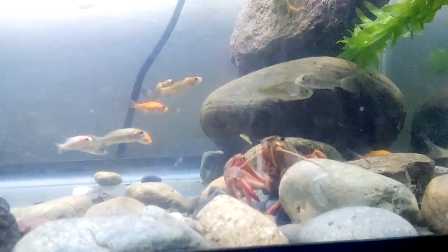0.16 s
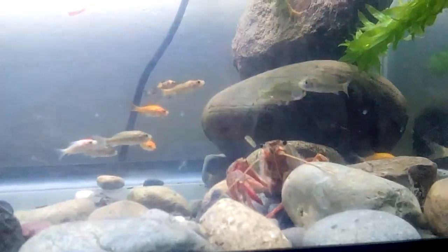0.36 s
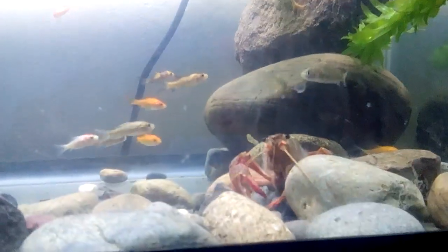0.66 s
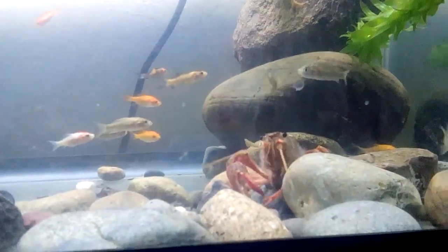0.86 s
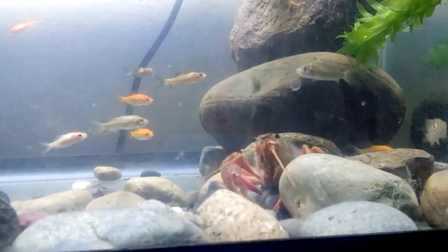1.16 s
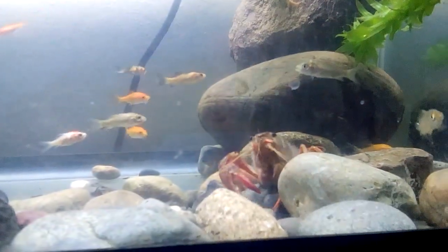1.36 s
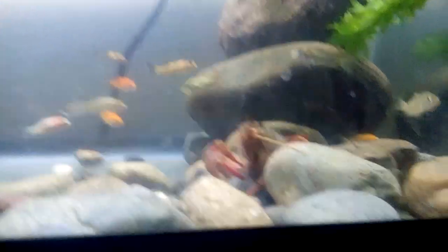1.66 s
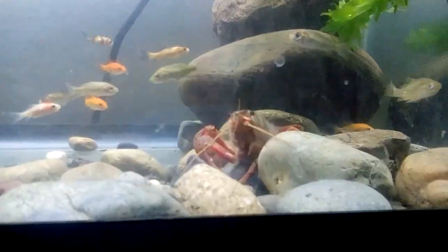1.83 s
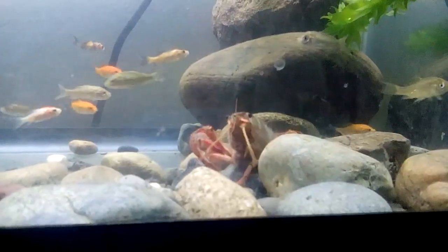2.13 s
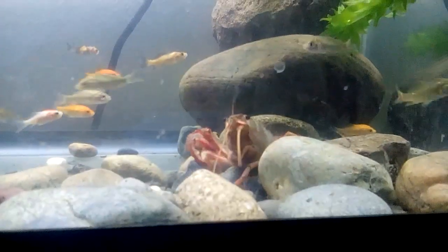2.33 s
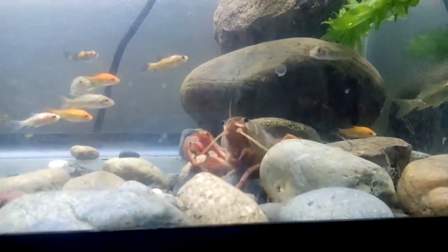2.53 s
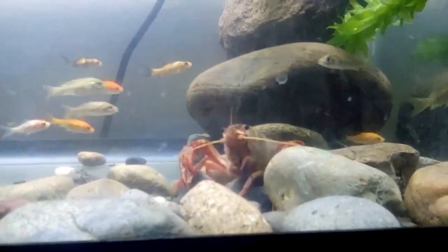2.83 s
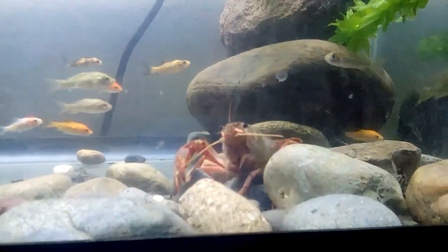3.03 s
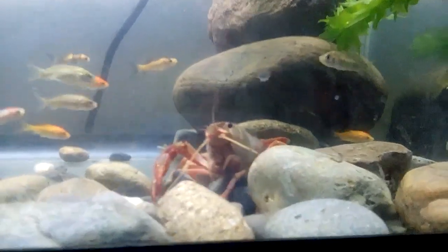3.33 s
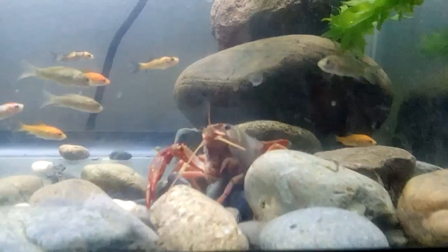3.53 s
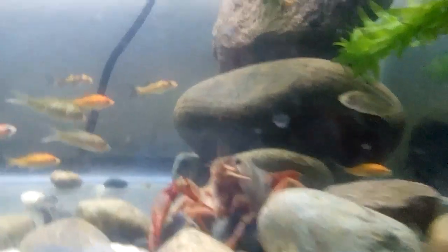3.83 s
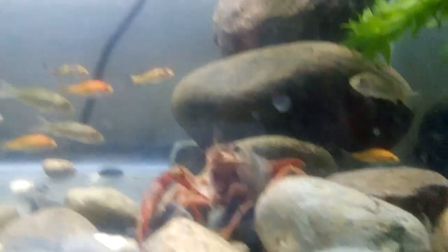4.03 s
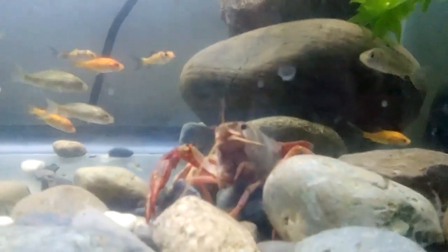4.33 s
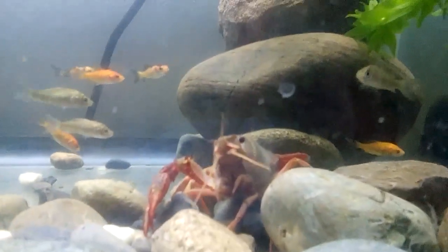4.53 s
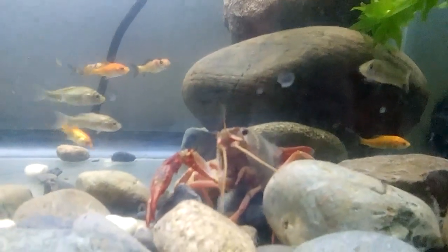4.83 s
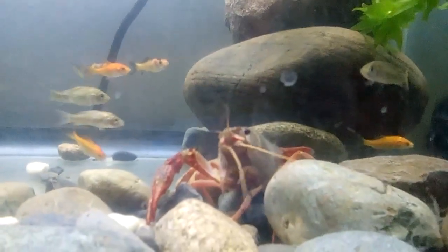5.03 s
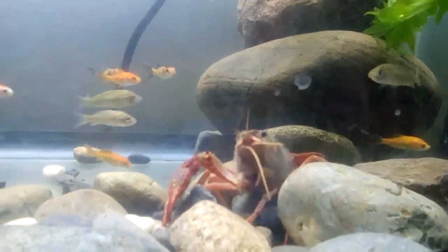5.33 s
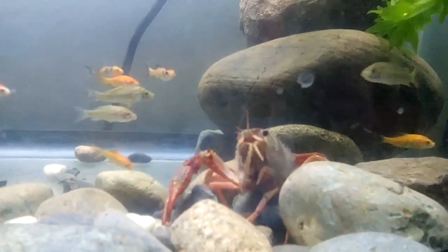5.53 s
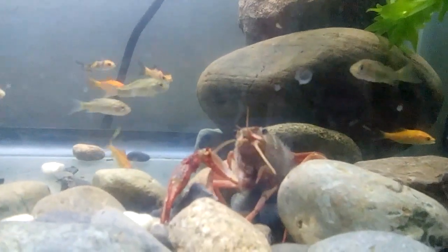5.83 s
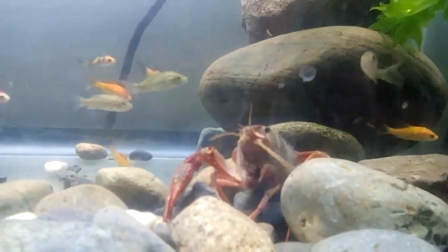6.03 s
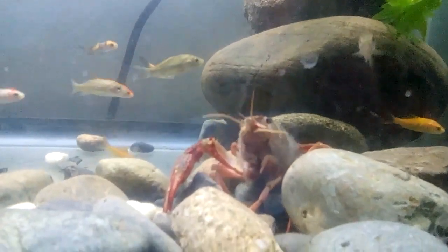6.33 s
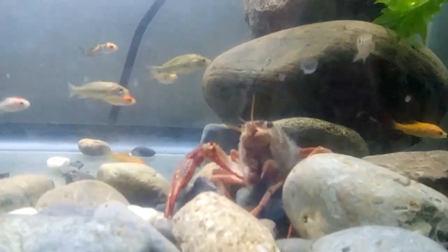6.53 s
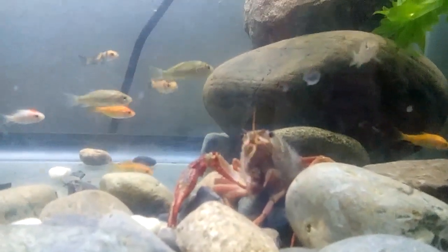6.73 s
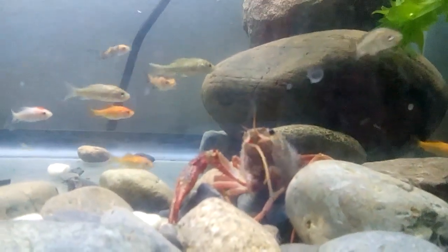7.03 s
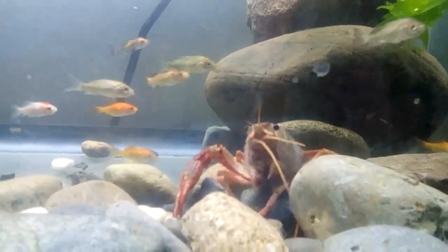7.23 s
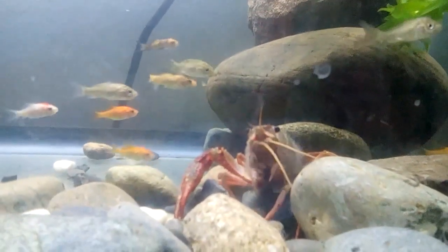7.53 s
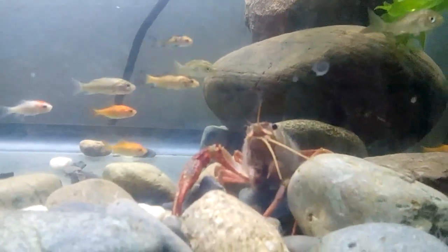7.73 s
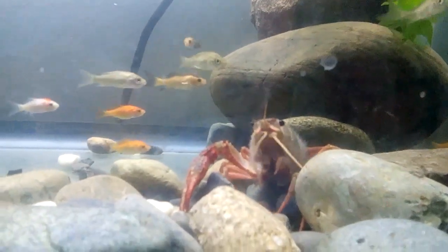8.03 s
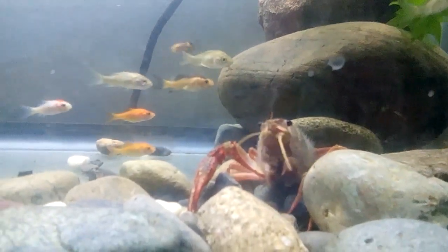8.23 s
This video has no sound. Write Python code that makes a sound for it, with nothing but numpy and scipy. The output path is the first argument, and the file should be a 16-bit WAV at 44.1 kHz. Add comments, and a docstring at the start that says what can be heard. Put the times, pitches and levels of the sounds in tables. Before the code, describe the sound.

A steady low electrical hum from an aquarium pump in a quiet room, with soft handling thumps, brief harsh crackles and a few sharp dry clicks.

```python
"""An aquarium pump hums at multiples of the mains in a quiet room, heard close by at two hand-held ports.
The hum is a sum of sines; the grip's sway and rumble, the room's murmur and the hiss are coloured noise.
Bumps of the hand are short low swings. Now and then the right port chatters, a noise clipped
between two limits, and small ticks, short band-passed noise bursts, sound at the left one.
The two ports are then blended into stereo."""
import sys
import numpy as np
from scipy import signal
from scipy.fft import rfft, irfft, next_fast_len
from scipy.io import wavfile
from scipy.ndimage import map_coordinates

SR = 44100
rng = np.random.default_rng(int(sys.argv[2]) if len(sys.argv) > 2 else 0)


def elevation(decibels):
    """Turn decibel levels (scalar or array-like) into linear amplitude ratios."""
    levels = np.asarray(decibels, float)
    return 10 ** (levels / 20)


def generate_wav(sig):
    """Save sig (samples, or channels by samples) to the path in sys.argv[1] as 16-bit PCM at SR."""
    pcm = np.round(np.clip(np.atleast_2d(sig).T, -1, 1) * 32767).astype(np.int16)
    wavfile.write(sys.argv[1], SR, pcm)


N = 369558

# bumps of the hand: (time [s], level before the low-pass [dB], swing frequency [Hz], push +1 or pull -1)
BUMPS = [(.027, -29, 69.3, 1), (.148, -29.5, 50.7, 1), (.195, -27.5, 112, 1), (0.214, -27, 59.8, -1),
         (.649, -30, 88.3, 1), (0.893, -30.5, 89.5, -1), (0.9488, -16, 96.2, -1), (.992, -25, 70, 1),
         (1.04, -26.5, 50, -1), (1.789, -21.5, 42.9, -1), (1.9323, -18.5, 93, 1), (1.944, -20, 62.5, -1),
         (2.957, -29, 70, 1), (3.217, -31.5, 56.4, 1), (3.6757, -21, 90.7, -1), (4.0217, -2.5, 103, 1),
         (4.053, -16.5, 63, -1), (4.074, -21, 86, 1), (4.094, -20.5, 45.4, -1), (5.124, -22.5, 93.6, -1),
         (5.189, -27.5, 81, -1), (6.0017, -30, 64, -1), (6.1552, -25, 62.5, -1), (6.7724, -22, 59.2, -1),
         (6.888, -23.5, 67.2, 1), (6.9436, -2.5, 84.7, 1), (6.992, -29.5, 56.6, 1)]


def along(points, hz, axis=1):
    """Frequency response: one column of (frequency [Hz], value, ..) points, interpolated on a log axis."""
    p = np.array(points, float)
    return np.interp(np.log(hz + 1e-3), np.log(p[:, 0]), p[:, axis])


def unit(x):
    """Normalisation of power: x scaled to rms 1."""
    return x / np.sqrt(np.mean(x ** 2))


def filtered(x, response):
    """Linear filtering: the spectrum of x times a complex response of frequency."""
    m = next_fast_len(x.shape[-1] + 8192)
    spectrum = rfft(x, m) * response(np.fft.rfftfreq(m, 1 / SR))
    return irfft(spectrum, m)[..., :x.shape[-1]]


def noise(spectrum, channels):
    """Spectral shaping: independent white noises, coloured and scaled to a joint rms of 1."""
    white = rng.standard_normal((channels, N))
    return unit(filtered(white, lambda hz: elevation(along(spectrum, hz))))


def wobble(rate):
    """Slow random modulation: a smooth curve through rate random knots a second."""
    knots = rng.standard_normal(int(N * rate / SR) + 4)
    return map_coordinates(knots, [np.arange(N) * rate / SR])


def curve(rows):
    """Amplitude envelope: (time [s], level [dB]) rows as gain per sample."""
    return elevation(np.interp(np.arange(N) / SR, *np.transpose(rows)))


def pump():
    """Magnetic hum: the motor's magnet pulls at multiples of the mains, each wavering; a faint whine varies."""
    mains_hz = 60.01
    # pump harmonics: (multiple of the mains, relative level [dB])
    harmonics = [(2, -1.5), (3, -12.5), (4, -14.5), (5, -31), (6, -29.5), (7, -29), (9, -42.5), (10, -48),
                 (11, -40), (12, -42), (13, -46.5)]
    # slow rise and fall of the hum's level: (time [s], level [dB])
    hum_level = [(0, -40), (3.8, -40.5), (4.15, -38), (4.5, -39), (5.5, -39), (6.3, -38.5), (7.1, -40),
                 (8.38, -38.5)]
    turn = 2 * np.pi * mains_hz * np.arange(N) / SR
    hum = np.zeros(N)
    for multiple, db in harmonics:
        phase = rng.uniform(0, 2 * np.pi)
        hum += elevation(db + 0.59 * wobble(3)) * np.sin(multiple * turn + phase)
    whine_band = noise([(1400, -30), (1500, 0), (1560, 0), (1660, -30)], channels=1)[0]
    whine = elevation(-38 + 2.5 * wobble(1.7)) * whine_band
    return curve(hum_level) * (np.sqrt(2) * hum + whine)


def grip():
    """Muscle tremor: slow sway and lumpy rumble, largely coherent at both ports, flaring after each bump."""
    # slow sway: (frequency [Hz], relative density [dB per Hz])
    sway = [(1, 5), (5, 6.5), (11, -6), (16, -12.5), (22, -23), (35, -55)]
    # rumble of the grip: (frequency [Hz], relative density [dB per Hz])
    rumble_spectrum = [(15, -34.5), (30, -6.5), (50, 0), (75, -4.5), (110, -8.5), (150, -18), (220, -33),
                       (400, -66.5)]
    # strength of the tremor between shudders: (time [s], level [dB])
    tremor = [(0, -47), (.7, -46), (1.4, -50.5), (2.4, -47.5), (2.9, -41.5), (3.9, -44), (5.4, -46.5),
              (5.9, -40.5), (6.8, -42), (7.9, -42.5), (8.38, -46.5)]
    shudder_db, shudder_peak_s = -30, 0.048  # level after a 0 dB bump, time to swell
    shudder_grows = 0.52  # dB of shudder per dB of bump
    shared, left, right = noise(rumble_spectrum, channels=3)
    ports = shared + .5 * np.array([left, right])
    rumble = unit(elevation(3.6 * wobble(9)) * ports)
    power = curve(tremor) ** 2
    for start, db, _, _ in BUMPS:
        u = np.clip(np.arange(N) / SR - start, 0, 2) / shudder_peak_s
        shudder = elevation(shudder_grows * db + shudder_db) * u * np.exp(1 - u)
        power = power + shudder ** 2  # unrelated tremors add in power
    return elevation(-43.0) * noise(sway, channels=1) + np.sqrt(power) * rumble


def room():
    """Ambient pressure: a murmur independent at each port, and air that presses one as it relieves the other."""
    # murmur of the room: (frequency [Hz], relative density [dB per Hz])
    murmur = [(80, -26.5), (150, -5), (210, 2.5), (270, -9.5), (400, -9), (520, -19.5), (900, -48.5)]
    # air in opposite phase at the two ports: (frequency [Hz], relative density [dB per Hz])
    across = [(80, -9), (200, 8), (300, 6), (500, -6.5), (900, -16), (2000, -15.5), (4000, -19),
              (7000, -14.5), (9000, -42.5)]
    opposed = noise(across, channels=1) * np.array([[1], [-1]])
    return elevation(-55.0) * noise(murmur, channels=2) + elevation(-52.5) * opposed


def hiss():
    """Self-noise: independent coloured noise at each port, its level wavering slightly in common."""
    # hiss of a port: (frequency [Hz], relative density [dB per Hz])
    hiss_spectrum = [(200, -0.5), (650, -1), (1000, -3), (1350, -1), (1550, -1.5), (1800, -3), (3500, 1),
                     (4500, 2), (6500, 0), (7600, -3)]
    top_edge = [(9000, -12.5), (11000, -58)]
    return elevation(-54 + .4 * wobble(1.5)) * noise(hiss_spectrum + top_edge, channels=2)


def bumps():
    """Damped impulse response: each bump is a soft push, a few low swings that swell and stop."""
    swell_cycles = 0.41  # swings until the envelope peaks
    stop = 1.03  # how abruptly the swings end
    out, t = np.zeros(N + SR), np.arange(SR // 4) / SR
    for start, db, hz, direction in BUMPS:
        u = t * hz / swell_cycles
        swell = u * np.exp((1 - u ** stop) / stop)
        swings = np.sign(direction) * elevation(db) * swell * np.sin(2 * np.pi * hz * t)
        out[round(start * SR):][:len(t)] += swings
    soft = signal.butter(3, 420, fs=SR, output="sos")  # flesh passes no sharp edge
    return signal.sosfilt(soft, out[:N])


def chatter():
    """Saturation: the overloaded port flips between two limits; a slow push holds it on one side for a while."""
    # chatter of the right port: (start [s], length [s], swing before the port's response [dB])
    bursts = [(.2382, .032, -2.8), (4.11, .0056, -1), (4.118, .01, -1), (6.95, .0058, -1.5),
              (7.081, .0535, -3.8)]
    # response of the port, before a 4 dB lift: (frequency [Hz], gain [dB])
    port = [(60, -12.5), (200, -10), (450, -15.5), (800, -20.5), (1500, -10.5), (2500, -5), (4400, 0.5),
            (6000, -0.5), (7500, -8.5)]
    # a burst that lasts long enough stalls early on, held by the push
    stall_after_s, stall_s, stall_push, stall_flutter = .0105, .011, 1.2, .1
    free_push, free_flutter = .5, .6  # weights of slow push and fast flutter otherwise
    slow = noise([(50, -15.5), (125, 2.0), (300, -4.5), (800, -9.5), (1500, -24)], channels=1)[0]
    fast = noise([(500, -10), (4400, -7), (9000, -4.0)], channels=1)[0]
    stutter = elevation(7 * wobble(700) + 4 * wobble(220))  # the flips come in uneven clumps
    out, t = np.zeros(N), np.arange(N) / SR
    for start, length, db in bursts:
        stalled = (t > start + stall_after_s) & (t < start + stall_after_s + stall_s)
        push = np.where(stalled, stall_push, free_push)
        flutter = np.where(stalled, stall_flutter, free_flutter)
        flips = np.tanh(6 * (push * slow + flutter * stutter * fast))
        # the port rings down after letting go: 60 dB in 15 ms
        settle = elevation(-20.5 - 60 * np.clip(t - start - length, 0, 1) / 0.015) * fast
        out += elevation(db) * np.where(t < start + length, flips, settle) * (t >= start)
    return filtered(out, lambda hz: elevation(along(port, hz) + 4))


def ticks():
    """Low-Q resonance: short dry snaps of the housing, each a broad ring around its own pitch."""
    # ticks at the left port: (time [s], level before the resonance [dB], pitch [Hz])
    snaps = [(3.0875, 3.5, 6000), (4.019, -12.5, 4480), (4.0467, -23, 5000), (4.184, -20.5, 4500),
             (4.1867, -15.5, 4040), (4.2423, -19, 4050), (7.009, -21.5, 2480), (7.514, -26, 3000)]
    t60_s = 0.0066  # a snap decays by 60 dB in this time
    out, t = np.zeros(N + SR), np.arange(SR // 20) / SR
    for start, db, hz in snaps:
        decay = elevation(db - 60 * t / t60_s)
        onset = 1 - np.exp(-t / .0001)
        snap = decay * onset * rng.standard_normal(len(t))
        ring = filtered(snap, lambda f: 1j * f * hz / (hz * hz - f * f + 1j * f * hz))  # Q of 1
        out[round(start * SR):][:len(t)] += ring
    return out[:N]


def scene():
    """Superposition at the two ports: what shakes both, and what each hears alone."""
    common = pump() + grip() + room() + hiss() + bumps()
    right = chatter()
    left = ticks()
    return common + np.array([left, right])


def low_pass(x):
    """Removes everything above the highest recorded frequency."""
    return signal.sosfilt(signal.butter(12, 8640, fs=SR, output="sos"), x)


def record(dry):
    """Crossfeed: each channel adds a share of the other port, inverted in the treble; peaks are rounded off."""
    # blend of one port into the other channel: (frequency [Hz], gain [dB], phase [rad])
    blend = [(150, -1.5, 0), (280, -2.5, 0), (530, -6.5, 0), (910, -7.5, .3), (1570, -5.5, .1),
             (2710, -9, -.1), (3700, -13, -.3), (4670, -16.5, -1.3), (5700, -15, -2.6), (7000, -13, -3),
             (8300, -7, -3.4)]
    # left over right: (frequency [Hz], gain [dB], phase [rad])
    lean = [(10, -1, 0), (40, -1.2, -.09), (130, -1, -.12), (180, -1.2, .05), (240, 0, .18), (400, -.2, 0),
            (4000, .5, 0), (7000, 3.5, 0), (8000, 2, 0)]
    # band limit of both channels: (frequency [Hz], gain [dB])
    limit = [(7400, 1), (8000, -5), (8400, -25), (8800, -32), (9600, -65)]
    other = filtered(dry[::-1], lambda hz: elevation(along(blend, hz)) * np.exp(1j * along(blend, hz, axis=2)))
    wide = (dry + other) / 2
    half = np.array([[.5], [-.5]])  # the lean is shared out between left and right

    def channel_response(hz):
        """Complex transfer function: the band limit and half the lean, opposite in left and right."""
        gain = elevation(along(limit, hz) + half * along(lean, hz))
        return gain * np.exp(1j * half * along(lean, hz, axis=2))

    wide = filtered(wide, channel_response)
    wide = wide / (1 + np.abs(wide / .96) ** 8) ** (1 / 8)  # soft ceiling at .96
    return low_pass(wide)


dry = scene()
out = record(dry)
generate_wav(out)
```